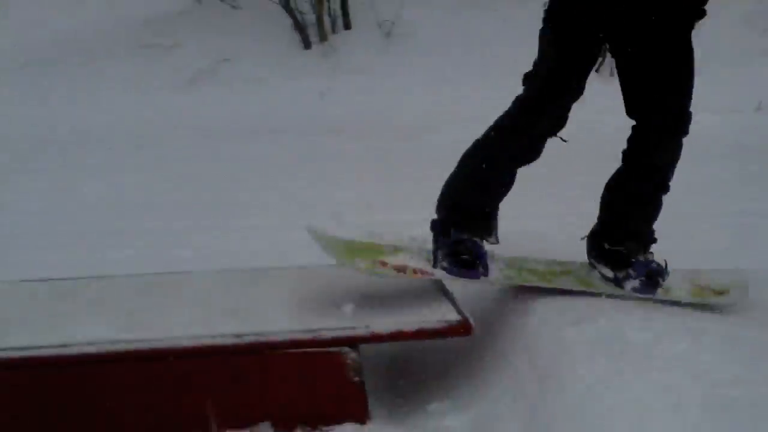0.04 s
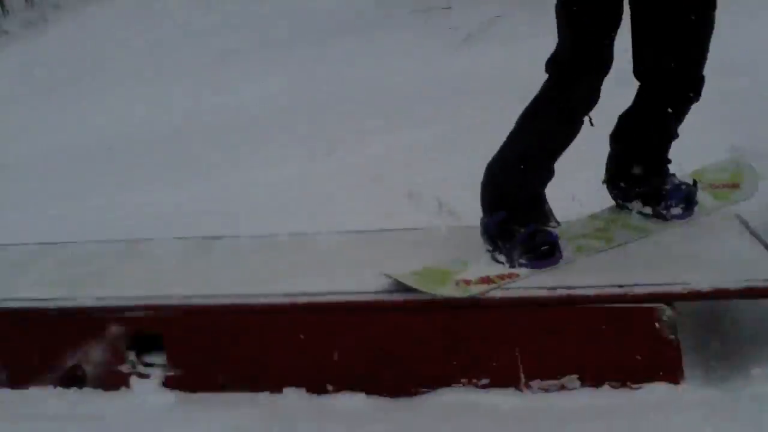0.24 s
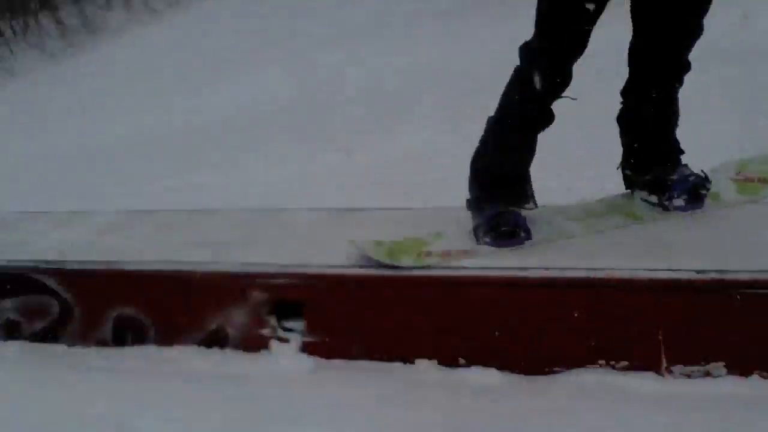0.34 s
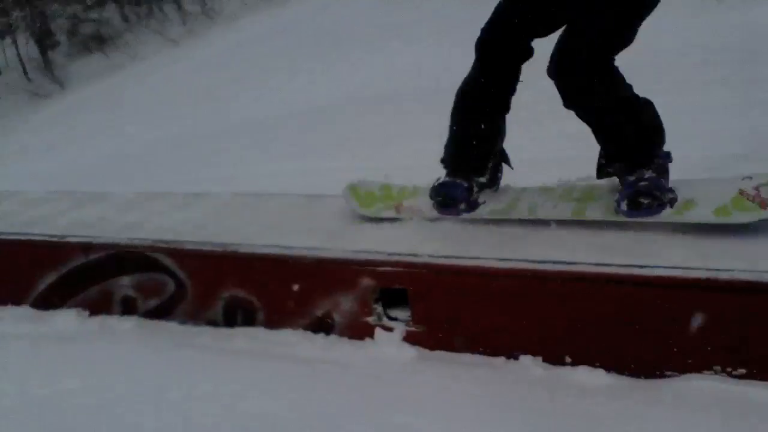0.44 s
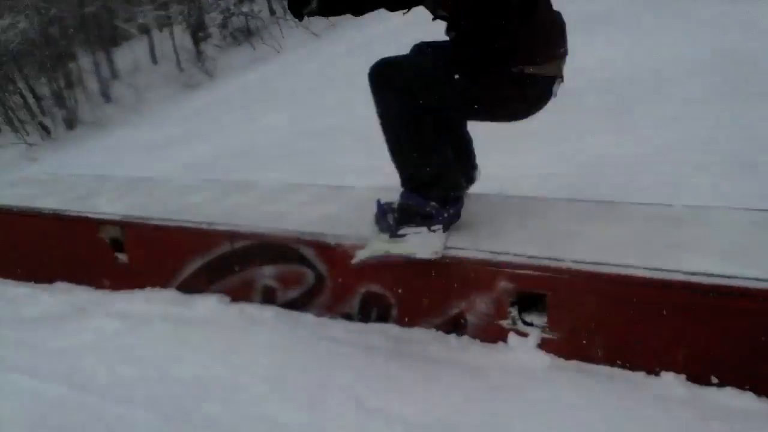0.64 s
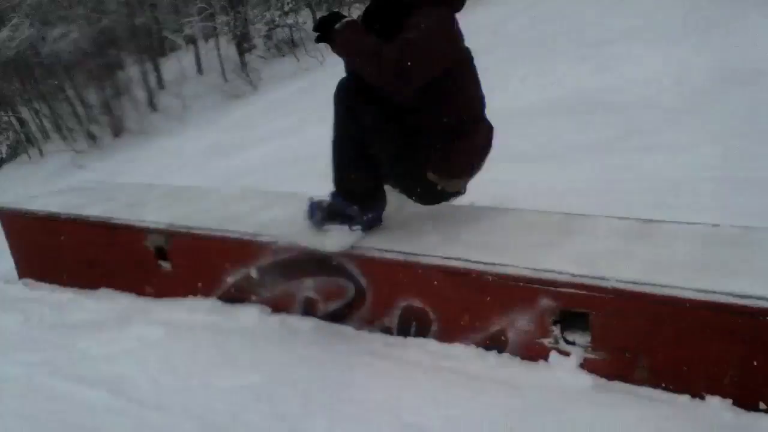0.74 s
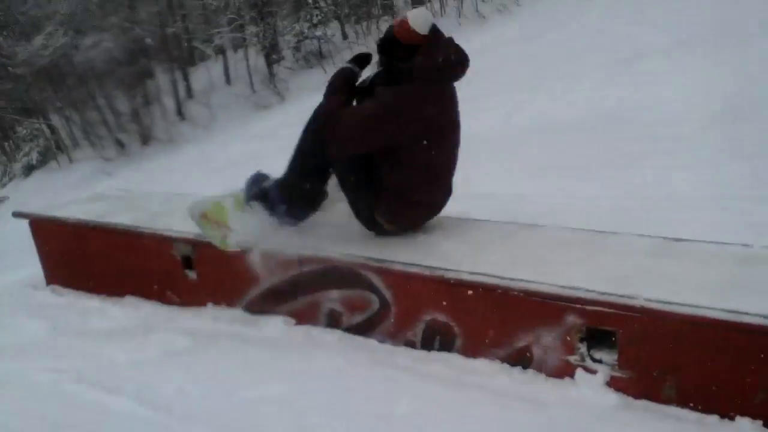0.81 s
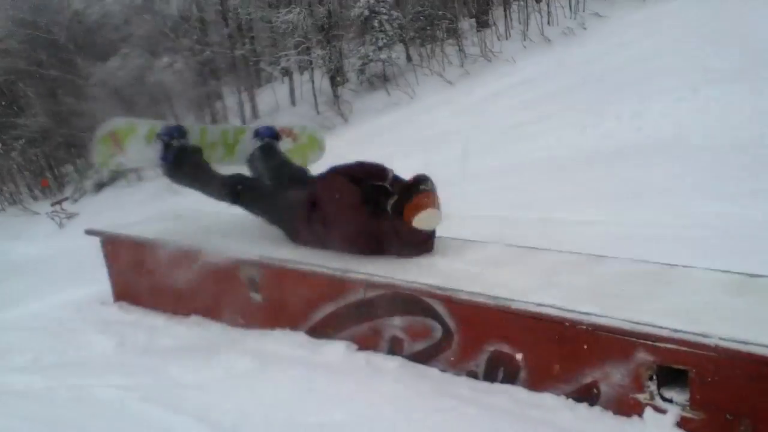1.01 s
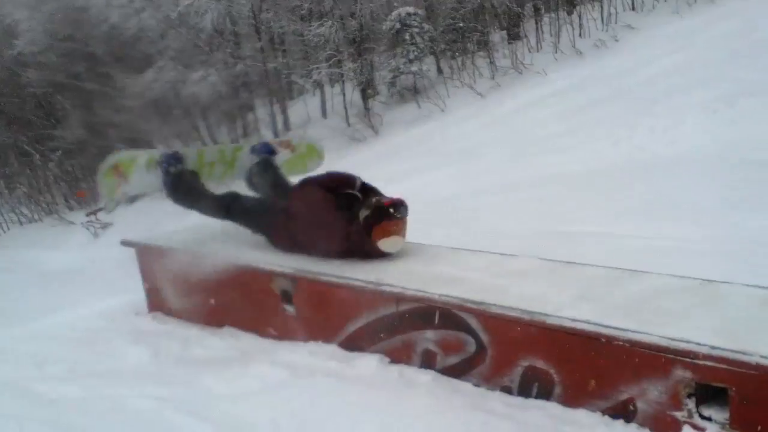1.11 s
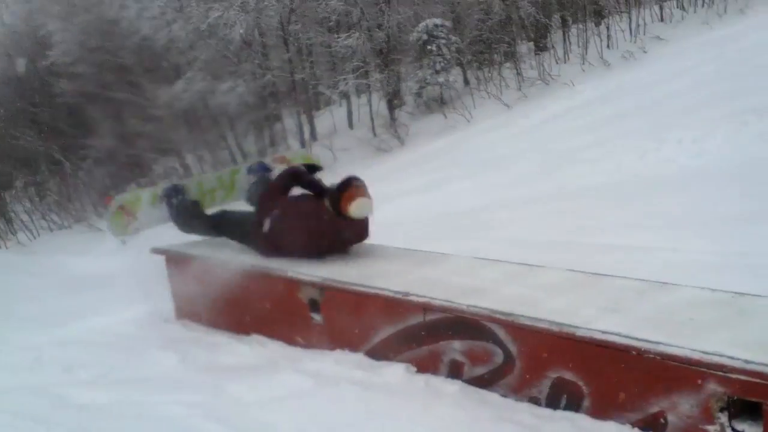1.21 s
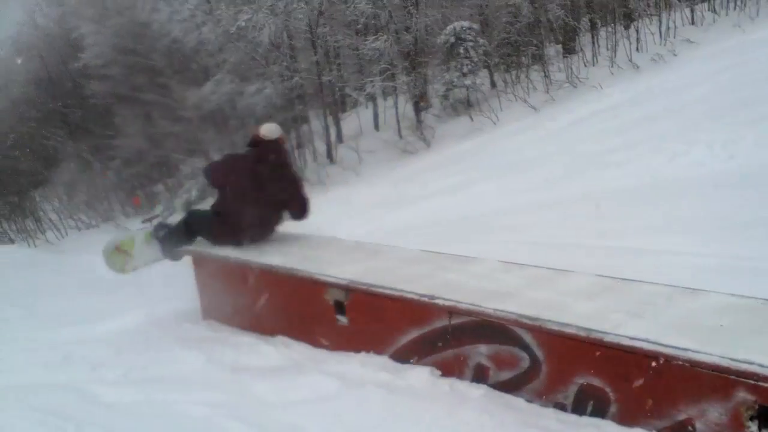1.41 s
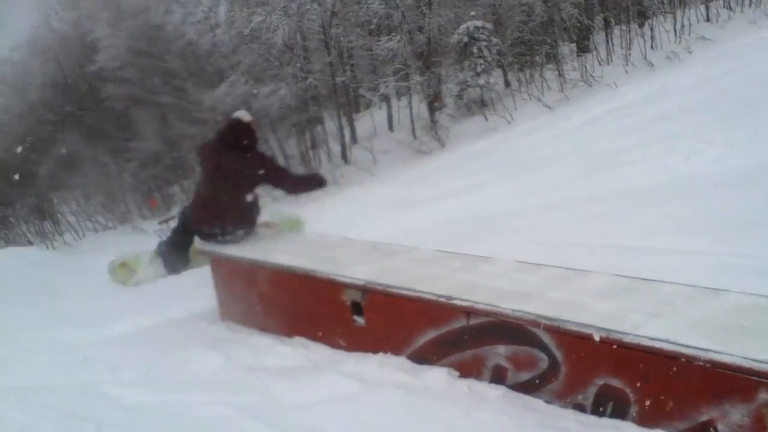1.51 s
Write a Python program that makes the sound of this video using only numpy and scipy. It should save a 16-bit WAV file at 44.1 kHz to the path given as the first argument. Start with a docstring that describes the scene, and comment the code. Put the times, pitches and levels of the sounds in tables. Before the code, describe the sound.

Snowboard on a slide box: short snowy hiss, loud double slap, gritty grind, brief lull, then a cluster of knocks and cloth rubbing, fading to light scrapes and one late sharp clack. Open slope, nearly dry, slightly overloaded small microphone.

```python
"""A snowboarder hisses up to a slide box, slaps the board onto it and grinds along sideways.
The board slips out and clatters on the deck; the rider falls and slides on in rustling
clothes, with scrapes, short squeaks and a late clack, while fine powder patters down.
Rubbing is filtered noise with ice grains, blows are short noise bursts with ringing tones,
and squeaks are wavering tones. A small camera nearby overloads on the loudest blows."""
import sys
import numpy as np
from scipy import signal
from scipy.fft import rfft, irfft
from scipy.io import wavfile

SR = 44100
rng = np.random.default_rng(int(sys.argv[2]) if len(sys.argv) > 2 else 0)


def log_audio(samples):
    """Write samples as a 16-bit WAV file to the path given in sys.argv[1]."""
    # one column per channel
    frames = np.atleast_2d(samples).T
    # limit to full scale, then quantise
    limited = np.clip(frames, -1, 1)
    pcm = np.round(limited * 32767).astype(np.int16)
    wavfile.write(sys.argv[1], SR, pcm)


N = 68355
T = np.arange(N) / SR  # time in seconds

# Board running on snow, then skimming clear of it. Each row: time in seconds, level in dB.
RUN_IN_LEVEL = [(0, -28.5), (.072, -33.5), (.103, -25), (.118, -39), (.17, -38), (.235, -37.5), (.28, -50),
                (.53, -43), (.57, -42.5), (.605, -32.5), (.625, -29), (.72, -83)]
# Board grinding along the deck. Each row: time in seconds, level in dB, low rasp level in dB.
GRIND_LEVEL = [(.236, -92, -90), (.243, -56, -40), (.252, -35, -17), (.286, -28, -21.5),
               (.295, -18.5, -19.5), (.33, -19.5, -18), (.37, -24, -28.5), (.41, -19, -32),
               (.463, -20, -31), (.485, -27.5, -44), (.516, -29.5, -22), (.526, -57, -58), (.57, -88, -92)]
# Rider and board dragging over the deck.
# Each row: time in seconds, level in dB, level of the deck's rumble in dB.
DRAG_LEVEL = [(.61, -90, -85), (.625, -24, -40), (.672, -39, -39), (.68, -20, -52), (.715, -19.5, -77),
              (.755, -23, -40), (.777, -25.5, -39.5), (.82, -23.5, -43), (.85, -21, -56),
              (.882, -18.5, -50), (.893, -28, -38.5), (.925, -33.5, -52), (.94, -29.5, -58),
              (.99, -28.5, -65), (1.04, -34.5, -61), (1.09, -33, -69), (1.112, -30.5, -61),
              (1.195, -39, -61), (1.225, -30, -69), (1.283, -27.5, -76), (1.305, -27, -73),
              (1.34, -32, -78.5), (1.405, -28, -67), (1.42, -35.5, -61), (1.47, -38, -64),
              (1.55, -36.5, -81)]
# Fine snow thrown up by the board and by the fall, pattering down.
# Each row: time in seconds, level in dB.
POWDER_LEVEL = [(.11, -64), (.15, -42), (.19, -76), (.85, -62), (.95, -58), (1.0, -46.5), (1.1, -48),
                (1.2, -53.5), (1.3, -50), (1.42, -62), (1.55, -74)]

# Sound colours of snow, deck, rasp, cloth, rumble, crack, scrape, fine spray and open slope.
# Each row: frequency in Hz, relative strength in dB per Hz.
SNOW_COLOUR = [(60, -33), (200, -28), (310, -12), (450, -3), (1000, -1), (1800, -0.5), (3000, 0.5),
               (4600, 0), (5800, -4.5), (7200, -15.5), (10000, -28), (14500, -39), (16000, -50)]
DECK_COLOUR = [(60, -41), (200, -28), (350, -18.5), (600, -9.5), (1000, -1), (1650, 2), (2200, 2),
               (3000, 2.5), (4500, 5), (5800, 1), (7200, -12.5), (9000, -23), (14500, -38.5), (16000, -60)]
RASP_COLOUR = [(30, -52), (60, -34), (200, -23.5), (400, -16), (600, -8.5), (1100, -2.5), (1500, -5.5),
               (2050, 3.5), (2900, -4), (5000, -8), (9000, -48), (16000, -57)]
CLOTH_COLOUR = [(60, -43), (250, -24.5), (420, -17), (680, -4.5), (1150, -3), (1600, -4), (2150, 1),
                (2900, -2), (3500, 0), (3900, -3.5), (4600, -1), (5600, -5), (7200, -24.5), (10000, -36),
                (14500, -43), (16000, -102)]
RUMBLE_COLOUR = [(25, -39), (70, -10), (130, -0.5), (220, 1), (400, 1.5), (900, -25), (4000, -66)]
CRACK_COLOUR = [(100, -42), (500, -12.5), (1500, -1), (3000, 0), (4600, 1), (5900, -2), (7200, -21),
                (10000, -34), (16000, -53)]
SCRAPE_COLOUR = [(100, -31), (300, -17.5), (600, -2), (1500, -1.5), (3200, 0), (5500, 0), (7200, -18),
                 (10000, -40), (16000, -42)]
SPRAY_COLOUR = [(500, -30), (4000, 6), (7500, 5), (12000, -5.5), (16000, -24)]
WASH_COLOUR = [(25, -28), (60, -16), (150, -6), (300, -17), (650, 5.5), (1500, 2), (4500, -5.5),
               (7500, -21), (14500, -25), (16000, -63)]

# Hard blows. Each row: start in seconds, clack level in dB, clack pitch in Hz, crack level in dB,
# deck boom level in dB, boom pitch in Hz, rattle decay in seconds, board ring level in dB.
KNOCKS = [(.2428, -4, 1423, -10, -26, 528, 0.0046, -13), (0.2634, -7.5, 1570, -11, -25.5, 591, 0.0064, -19),
          (0.6221, -46, 2090, -7, -14, 695, 0.0039, -29), (0.638, -16, 3300, -13, -28, 780, 0.0088, -21),
          (.6762, -21, 1300, -44, -56, 710, 0.0046, -46), (.7302, -13, 996, -14.5, -19, 521, 0.0047, -23),
          (.7558, -13.5, 2060, -22, -51, 713, 0.0028, -48),
          (.8052, -12.5, 2600, -33, -42, 610, 0.0018, -38), (.8992, -20, 2360, -31, -33, 553, 0.0037, -38),
          (1.2066, -6.5, 2230, -49, -29, 808, 0.0024, -28)]
# Ringing tones of the board on the deck.
# Each row: pitch in Hz, relative level in dB, time to fall by 60 dB in seconds.
BOARD_TONES = [(184.4, -29, 0.2), (534, -6, 0.081), (621, -5, 0.066), (920, -10, 0.1), (1104, -6.5, 0.12),
               (1360, -10, 0.073), (1754, -11, 0.18), (2320, -4, 0.074), (2990, -10, 0.069),
               (3090, -3, 0.045), (4420, -3, 0.064), (4720, -16, 0.13)]
# Soft thuds of board and body. Each row: start in seconds, level in dB, middle pitch in Hz.
THUDS = [(0.092, -45, 400), (0.241, -41.5, 109), (.268, -40.5, 220), (.499, -45, 290), (0.634, -46, 251),
         (0.7244, -18.5, 508), (0.725, -40.5, 162), (.747, -19, 735), (.795, -44, 188), (0.949, -45, 90),
         (.988, -29.5, 630), (0.991, -37.5, 208), (1.289, -41, 240), (1.37, -40, 260), (1.4, -47, 195)]
# Edge scrapes. Each row: start in seconds, length in seconds, level in dB, fine spray level in dB.
SCRAPES = [(0.498, .015, -31, -40), (.6195, 0.0032, -15.5, -50), (0.634, 0.0089, -15, -47),
           (0.745, 0.023, -22, -63), (0.789, 0.0073, -25.5, -53), (0.876, 0.013, -24, -39),
           (0.896, .016, -17.5, -31), (0.94, .018, -20, -45), (1.016, 0.0038, -23, -58),
           (1.161, 0.013, -33, -56), (1.238, 0.013, -32, -64), (1.288, 0.0058, -21.5, -55),
           (1.4, 0.011, -23.5, -47), (1.484, 0.0054, -21.5, -65)]
# Stick-slip squeaks. Each row: start in seconds, length in seconds, level in dB,
# pitch at the top of the arch in Hz, random pitch wander as a share of that pitch.
SQUEAKS = [(0.862, 0.012, -19.5, 2073, 0.023), (0.878, 0.01, -14, 3470, 0.039),
           (0.883, 0.0096, -26, 1980, 0.049), (0.973, 0.019, -25, 1916, 0.009),
           (0.986, .013, -40, 1546, 0.084), (1.204, 0.0036, -21, 3620, 0.077),
           (1.219, 0.012, -26.5, 3580, 0.069)]
# Outdoor echoes. Each row: frequency in Hz, time to fall by 60 dB in seconds.
ECHO_FADE = [(100, 0.42), (1000, 0.13), (4000, 0.063), (12000, 0.069)]

# Blows: times in seconds, width of the clack's resonance in octaves
KNOCK_RISE_S, BOOM_RISE_S, BOOM_DECAY_S = 0.00018, 0.0036, 0.004
KNOCK_TAIL_DB, TAIL_DECAY_S, CLACK_OCTAVES = -29, 0.044, 0.36
# First touch of a blow: delay in seconds, energy against its rattle in dB
FIRST_TOUCH_S, FIRST_TOUCH_DB = 0.0004, -8
THUD_RISE_S, THUD_DECAY_S, THUD_OCTAVES = 0.001, 0.0057, 0.486
SCRAPE_RISE_S, SCRAPE_FALL_S = 0.0057, 0.0025
# Squeaks: share of pitch lost at both ends, loudness flutter in dB per unit of pitch wander
SQUEAK_ARCH, SQUEAK_FLUTTER_DB = 0.12, 41
ECHO_DB, WASH_DB = -21, -48.5
CLIP_LEVEL, EDGE_HZ = 1.1, 15600


def amp(db):
    """Turns decibels into a gain."""
    return 10 ** (np.asarray(db) / 20)


def unit(x):
    """Scales a sound to an average (rms) strength of 1."""
    return x / np.sqrt(np.mean(x ** 2) + 1e-20)


def read(points, hz):
    """Reads a table between its rows, along a log-frequency axis."""
    f, value = np.transpose(points)
    return np.interp(np.log(hz + 1), np.log(f + 1), value)


def level(table, column=1):
    """Turns one dB column of a table into a gain over time."""
    rows = np.array(table)
    return amp(np.interp(T, rows[:, 0], rows[:, column]))


def add(mix, start_s, sound):
    """Mixes a sound in at its start time."""
    part = mix[max(round(start_s * SR), 0):][:len(sound)]
    part += sound[:len(part)]


def colour(x, points):
    """Filters a sound to the given colour, with no sound ahead of its cause."""
    log_gain = np.log(amp(read(points, abs(np.fft.fftfreq(4096, 1 / SR)))))
    # Minimum phase: the filter responds as early as it can
    taps = np.fft.ifft(np.exp(np.conj(signal.hilbert(log_gain)))).real[:2048]
    return signal.fftconvolve(x, taps / np.linalg.norm(taps))[:len(x)]


def hump(hz, octaves):
    """Makes the colour of one broad resonance with steep sides."""
    f = np.geomspace(20, 20000, 120)
    distance = np.log2(f / hz) / octaves
    return np.transpose([f, -20 * np.log10(1 + distance ** 2 / 2 + distance ** 4 / 10)])


def wobble(n, hz):
    """Makes a smooth random curve that wanders mostly below the given rate."""
    spectrum = rfft(rng.standard_normal(N))
    smoothing = 1 + (np.fft.rfftfreq(N, 1 / SR) / hz) ** 4
    return unit(irfft(spectrum / smoothing, N))[:n]


def friction(n, chatter_db, lump_db, grit, grains_per_s):
    """Rubbing: hiss and separate ice grains, clumped by fast chatter and slower lumps."""
    hits = rng.random(n) < grains_per_s / SR
    sizes = amp(2.6 * np.minimum(rng.exponential(1, n), 2))
    grains = hits * sizes * rng.choice([-1, 1], n)
    # grit is the grains' share of the energy
    drive = np.sqrt(1 - grit) * rng.standard_normal(n) + np.sqrt(grit) * unit(grains)
    return unit(drive * amp(chatter_db * wobble(n, 200) + lump_db * wobble(n, 53)))


def burst(points, rise_s, decay_s, tail_db):
    """A contact of fixed energy: a sharp first touch, then a quickly dying rattle with a weak tail."""
    t = T[:SR // 5]
    fade = np.exp(-t / decay_s) + amp(tail_db) * np.exp(-t / TAIL_DECAY_S)
    shape = (1 - np.exp(-t / rise_s)) * fade
    force = shape * rng.choice([-1., 1.], len(t))
    force[round(FIRST_TOUCH_S * SR)] += amp(FIRST_TOUCH_DB) * np.linalg.norm(shape)
    return unit(colour(force, points)) * np.sqrt(np.mean(shape ** 2)) / shape.max()


def knocks():
    """Each hard blow cracks, clacks, booms in the box and rings the board's own tones."""
    out, t = np.zeros(N), T[:SR // 5]
    ring = np.zeros(len(t))
    for k, (hz, db, t60) in enumerate(BOARD_TONES):
        # Every other tone starts in the opposite direction
        ring += (-1) ** k * amp(db - 60 * t / t60) * np.sin(2 * np.pi * hz * t)
    swell = (1 - np.exp(-t / BOOM_RISE_S)) ** 2 * np.exp(-t / BOOM_DECAY_S)
    swell /= swell.max()
    for start_s, clack_db, clack_hz, crack_db, boom_db, boom_hz, decay_s, ring_db in KNOCKS:
        clack = burst(hump(clack_hz, CLACK_OCTAVES), KNOCK_RISE_S, decay_s, KNOCK_TAIL_DB)
        crack = burst(CRACK_COLOUR, KNOCK_RISE_S, decay_s, KNOCK_TAIL_DB)
        boom = swell * np.sin(2 * np.pi * boom_hz * t)
        add(out, start_s, amp(clack_db) * clack + amp(crack_db) * crack
            + amp(boom_db) * boom + amp(ring_db) * ring)
    return out


def grind():
    """The board rubs along the icy deck, with a low rasp that is strongest at the landing."""
    hiss = friction(N, chatter_db=0.9, lump_db=1.5, grit=0.33, grains_per_s=3300)
    rasp = friction(N, chatter_db=2.3, lump_db=1.1, grit=0.52, grains_per_s=1600)
    hiss = colour(hiss * level(GRIND_LEVEL), DECK_COLOUR)
    return hiss + colour(rasp * level(GRIND_LEVEL, column=2), RASP_COLOUR)


def drag():
    """Clothes and board rub over the hollow box, which rumbles below."""
    rub = friction(N, chatter_db=1.6, lump_db=2.42, grit=0.35, grains_per_s=2000)
    rumble = friction(N, chatter_db=2.5, lump_db=6.5, grit=0.3, grains_per_s=350)
    rub = colour(rub * level(DRAG_LEVEL), CLOTH_COLOUR)
    return rub + colour(rumble * level(DRAG_LEVEL, column=2), RUMBLE_COLOUR)


def snow():
    """The base of the board hisses and crunches over packed snow."""
    rub = friction(N, chatter_db=0.1, lump_db=1.3, grit=0.53, grains_per_s=1100)
    return level(RUN_IN_LEVEL) * colour(rub, SNOW_COLOUR)


def scrapes():
    """An edge bites briefly, throws fine ice and lets go."""
    out, t = np.zeros(N), T[:SR // 10]
    for start_s, length_s, db, spray_db in SCRAPES:
        rise = np.minimum(t / SCRAPE_RISE_S, 1)
        shape = rise * np.exp(-np.maximum(t - length_s, 0) / SCRAPE_FALL_S)
        bite, spray = (
            shape * friction(len(t), chatter_db=-0.5, lump_db=0.0, grit=0.62, grains_per_s=2100)
            for _ in range(2))
        add(out, start_s, amp(db) * colour(bite, SCRAPE_COLOUR)
            + amp(spray_db) * colour(spray, SPRAY_COLOUR))
    return out


def squeaks():
    """Sticking and slipping on the wet deck makes a short, unsteady tone that rises and falls."""
    out = np.zeros(N)
    for start_s, length_s, db, top_hz, jitter in SQUEAKS:
        u = np.arange(0, length_s, 1 / SR) / length_s  # 0 at the start, 1 at the end
        arch = 1 - SQUEAK_ARCH * (2 * u - 1) ** 2
        hz = top_hz * (arch + jitter * wobble(len(u), 700))
        phase = 2 * np.pi * np.cumsum(hz) / SR
        tone = np.sin(phase) + amp(-23) * np.sin(2 * phase)
        tone *= amp(SQUEAK_FLUTTER_DB * jitter * wobble(len(u), 320))
        add(out, start_s, amp(db) * unit(tone * np.sqrt(np.sin(np.pi * u))))
    return out


def thuds():
    """Weight coming down gives dull blows, each a noise burst around one pitch."""
    out = np.zeros(N)
    for start_s, db, hz in THUDS:
        thud = burst(hump(hz, THUD_OCTAVES), THUD_RISE_S, THUD_DECAY_S, tail_db=-38)
        add(out, start_s, amp(db) * thud)
    return out


def powder():
    """Fine snow patters down as bright, grainy noise."""
    patter = friction(N, chatter_db=0.5, lump_db=1.5, grit=0.3, grains_per_s=1200)
    return level(POWDER_LEVEL) * colour(patter, SPRAY_COLOUR)


def slope_echoes(x):
    """The box, the snow and the trees throw back weak, scattered echoes."""
    n = SR // 2
    taps = rng.choice([-1., 1.], n) * (rng.random(n) < 2000 / SR)  # about 2000 echoes a second
    hz, t, z = signal.stft(taps, SR, nperseg=256)
    fade = amp(-60 * t / read(ECHO_FADE, hz)[:, None])  # each frequency fades at its own pace
    tail = signal.istft(z * fade, SR, nperseg=256)[1]
    return signal.fftconvolve(x, tail / np.linalg.norm(tail))[:N]


def wash():
    """The open slope adds a faint noise that flutters slightly in level."""
    noise = rng.standard_normal(N) * amp(0.57 * wobble(N, 47))
    return amp(WASH_DB) * colour(noise, WASH_COLOUR)


def scene():
    """Adds up all contacts, their outdoor echoes, the wash and the powder."""
    contacts = snow() + grind() + drag() + knocks() + thuds() + scrapes() + squeaks()
    return (contacts + amp(ECHO_DB) * slope_echoes(contacts) + (wash() + powder()))[None]


def record(dry):
    """The camera flattens the loudest peaks, then cuts the highest treble."""
    clipped = dry / (1 + (dry / CLIP_LEVEL) ** 8) ** (1 / 8)
    lowpass = signal.firwin(255, EDGE_HZ, window=("kaiser", 9), fs=SR)
    return signal.oaconvolve(clipped, lowpass[None], "same")


dry = scene()
out = record(dry)
log_audio(out)
```